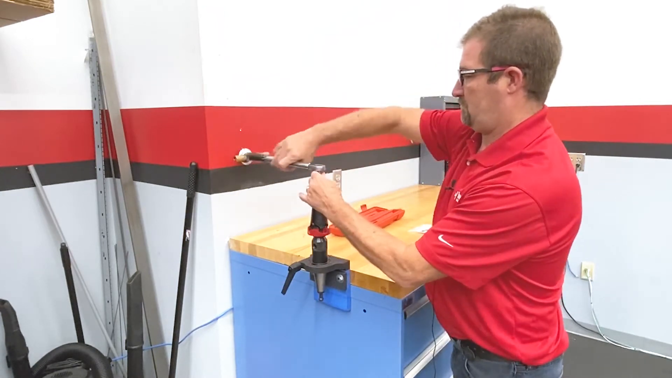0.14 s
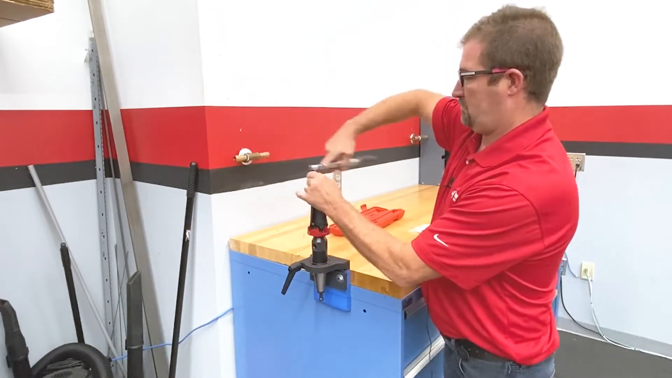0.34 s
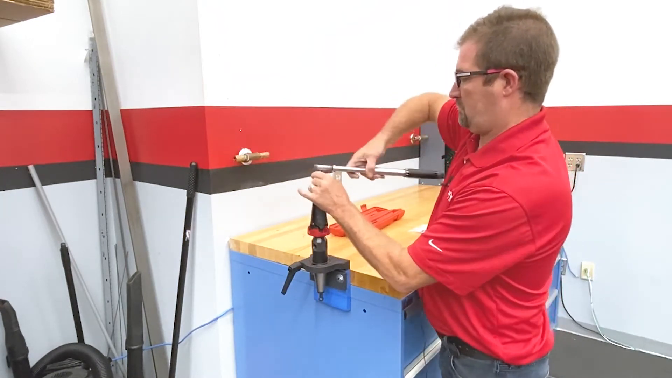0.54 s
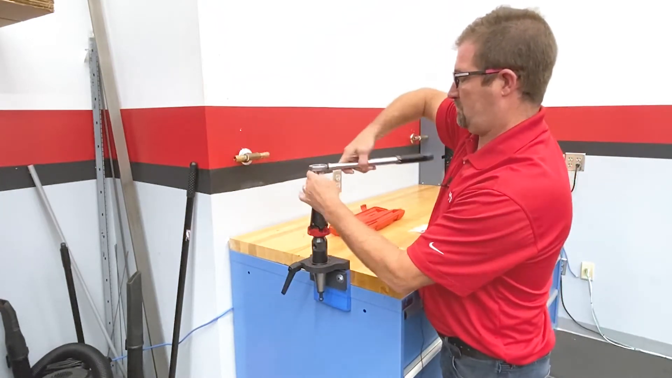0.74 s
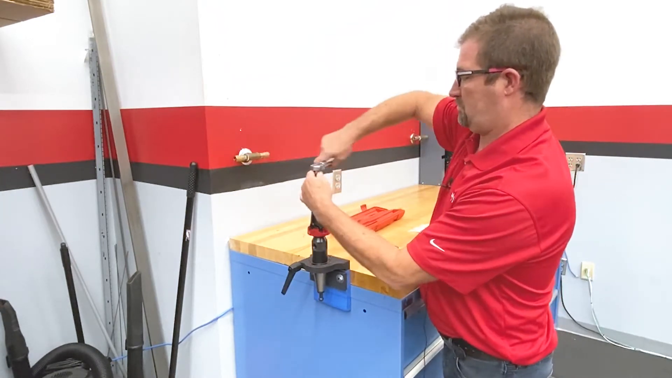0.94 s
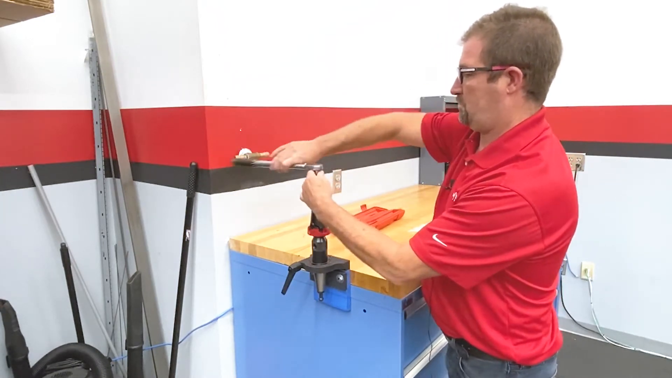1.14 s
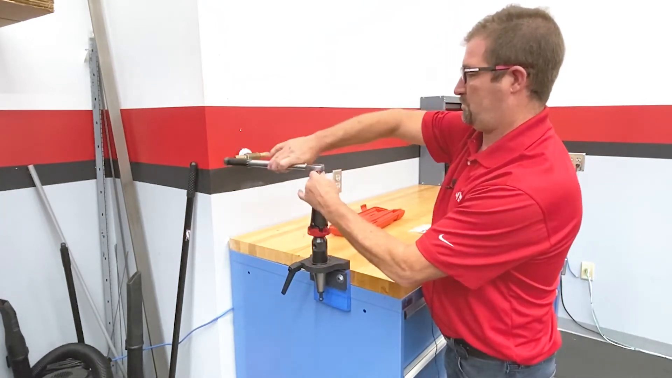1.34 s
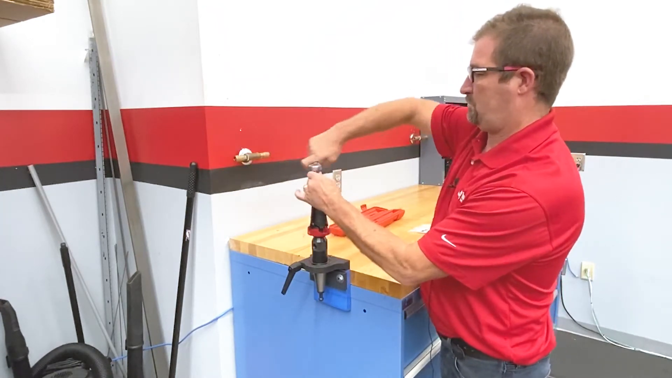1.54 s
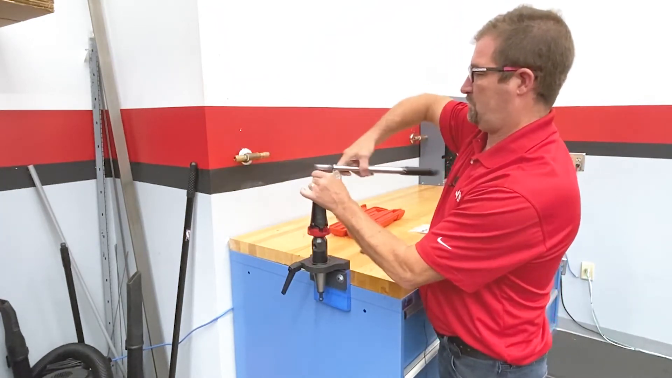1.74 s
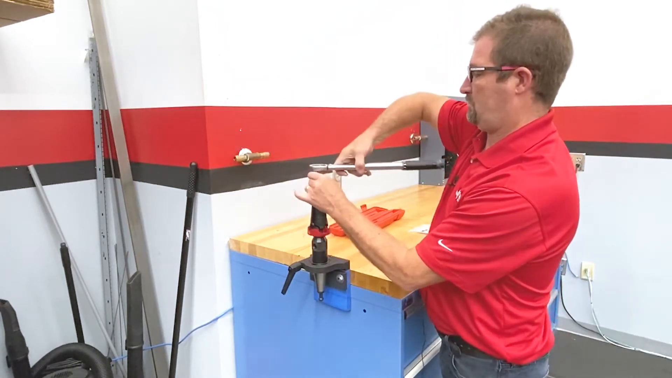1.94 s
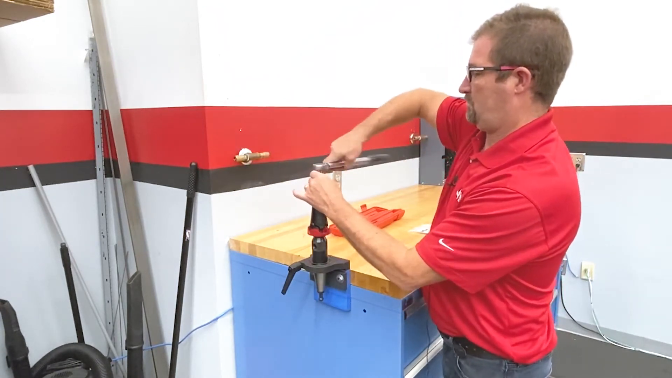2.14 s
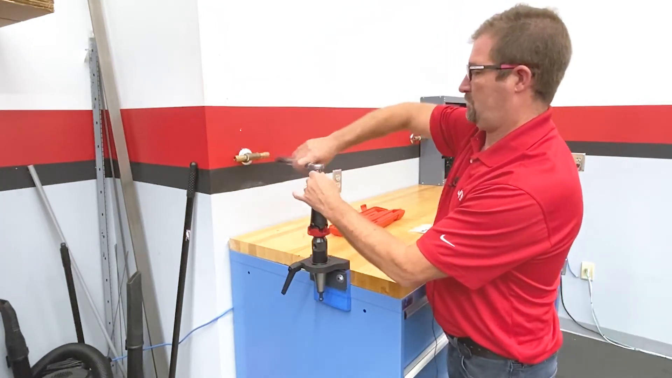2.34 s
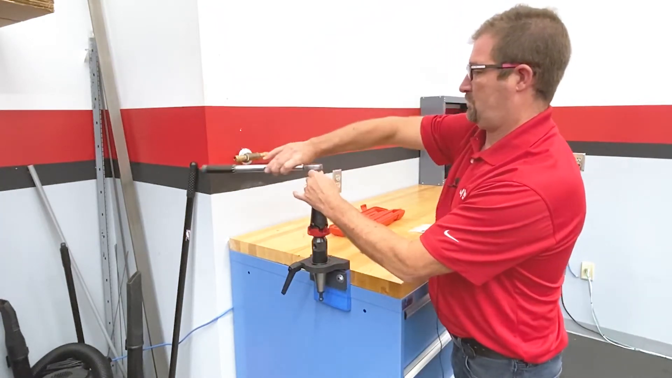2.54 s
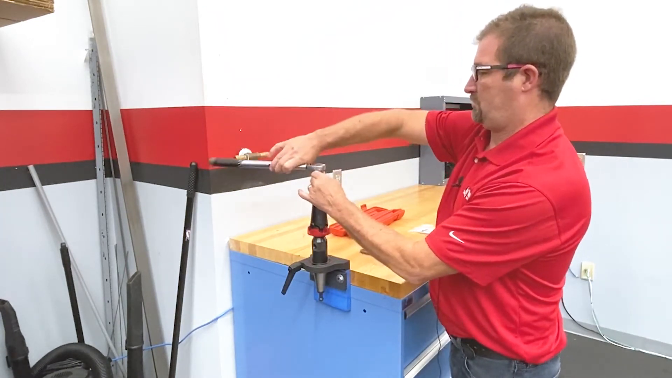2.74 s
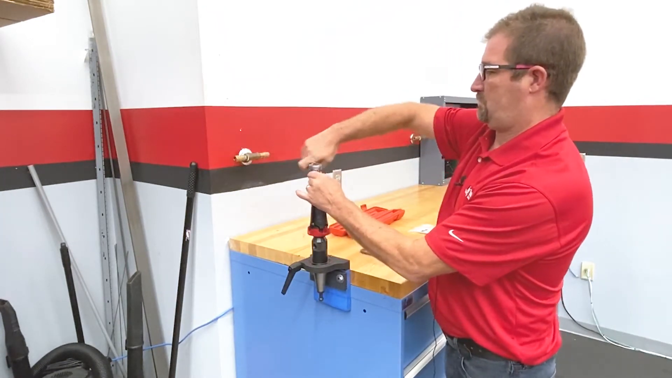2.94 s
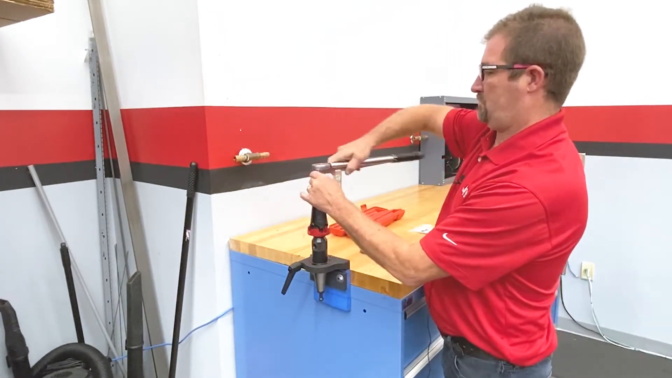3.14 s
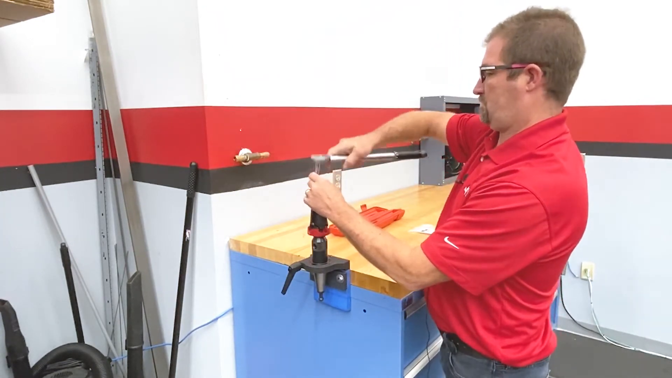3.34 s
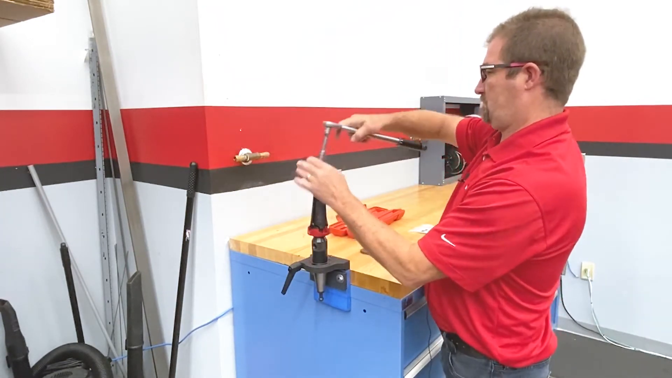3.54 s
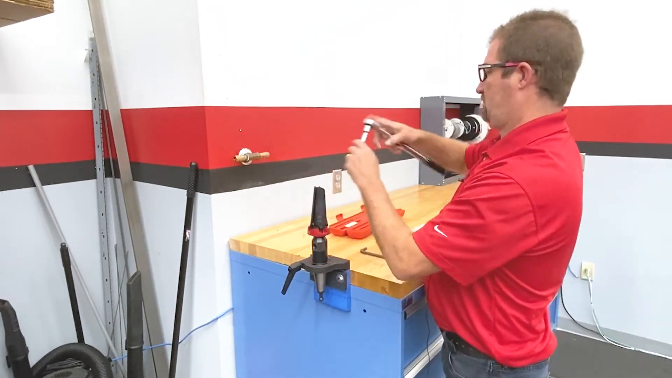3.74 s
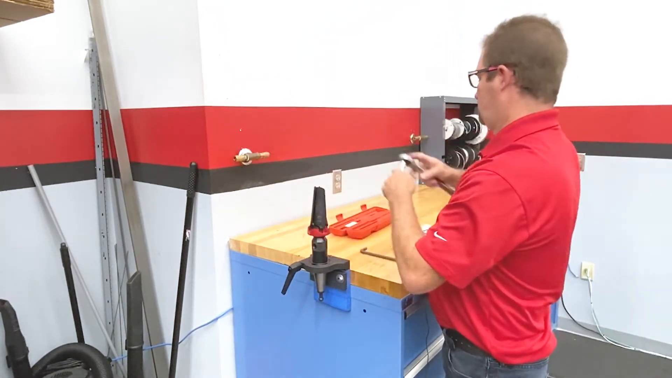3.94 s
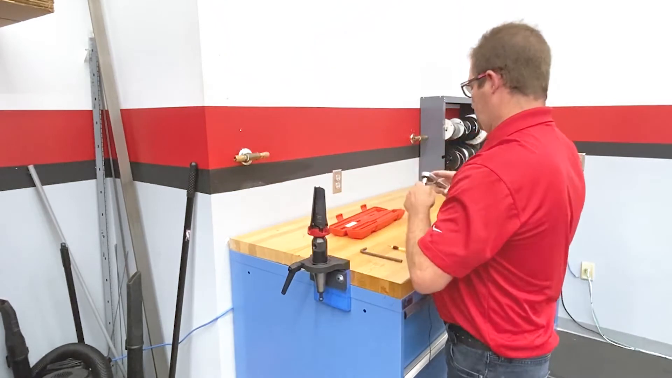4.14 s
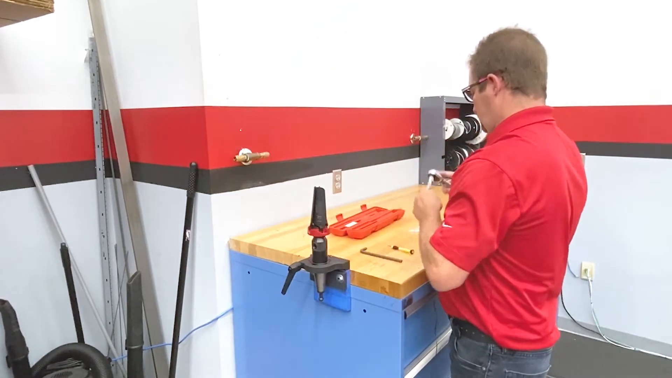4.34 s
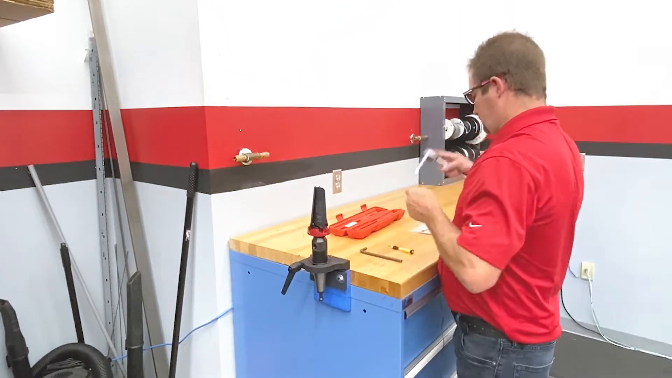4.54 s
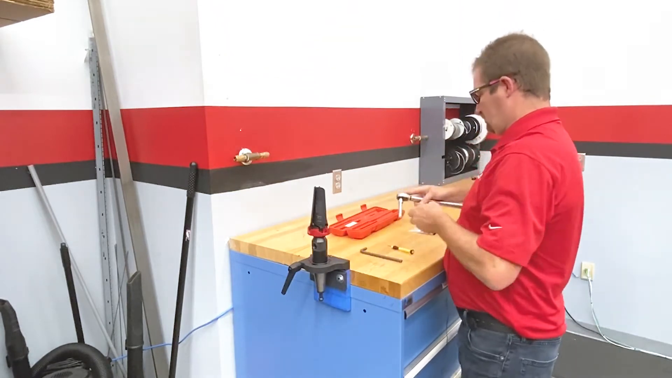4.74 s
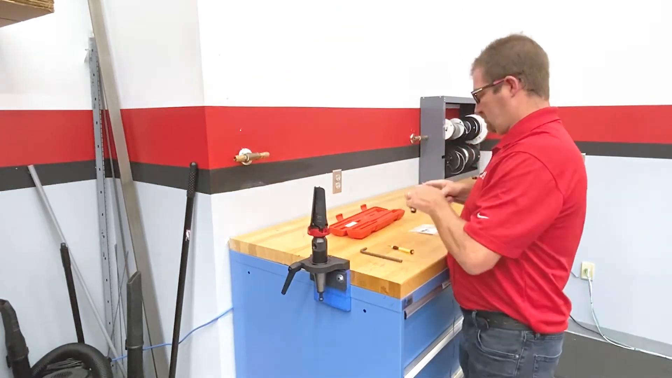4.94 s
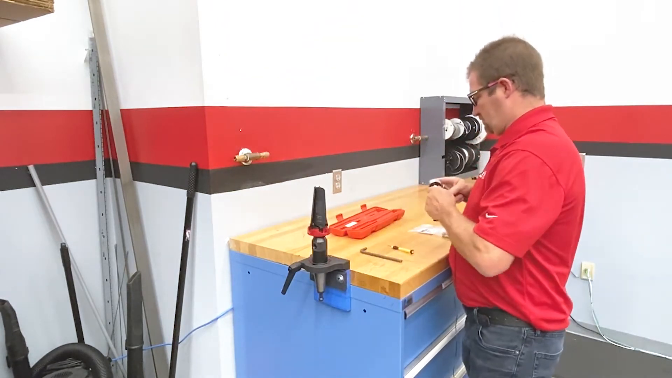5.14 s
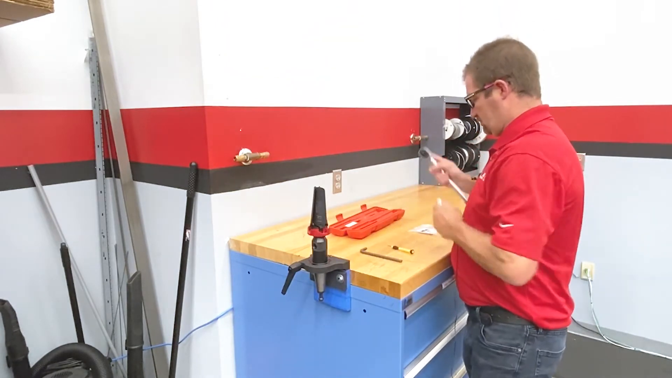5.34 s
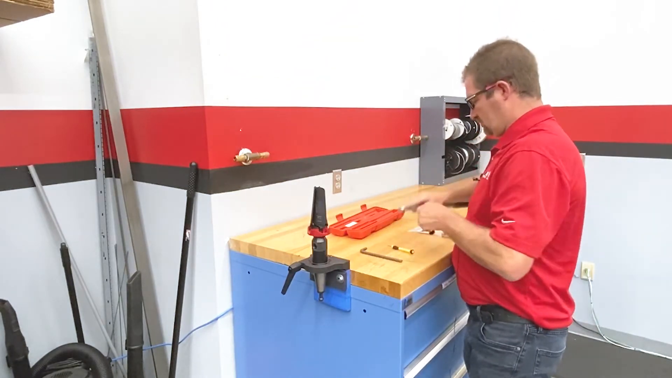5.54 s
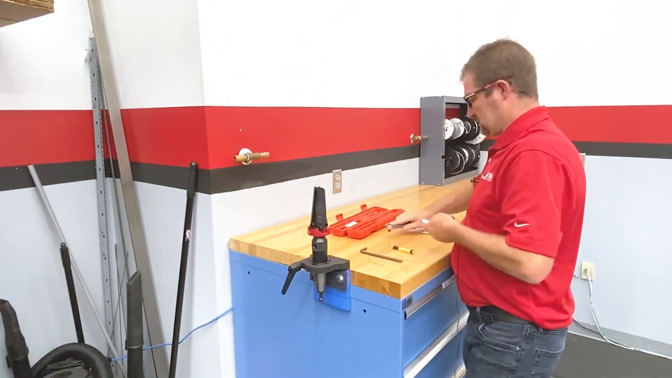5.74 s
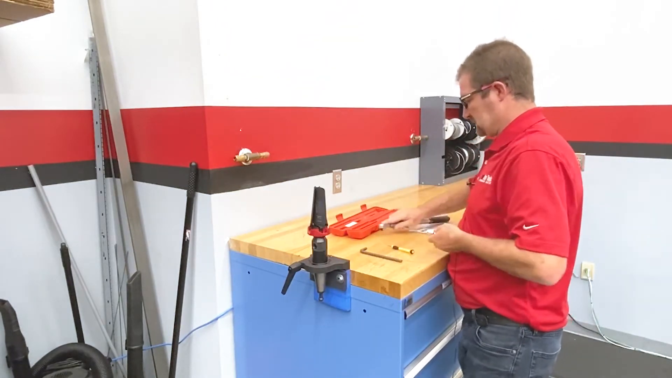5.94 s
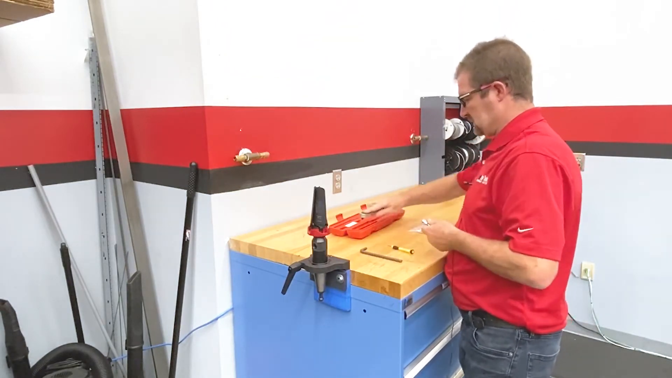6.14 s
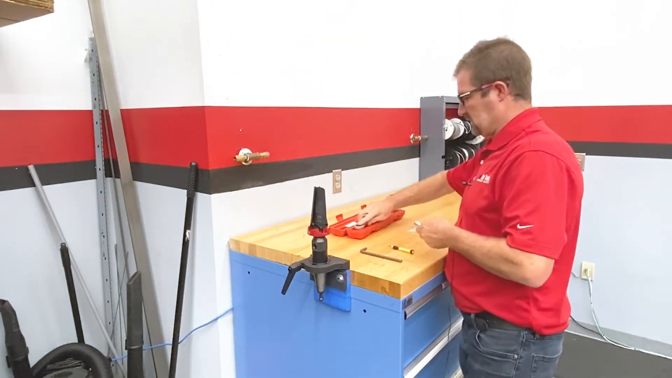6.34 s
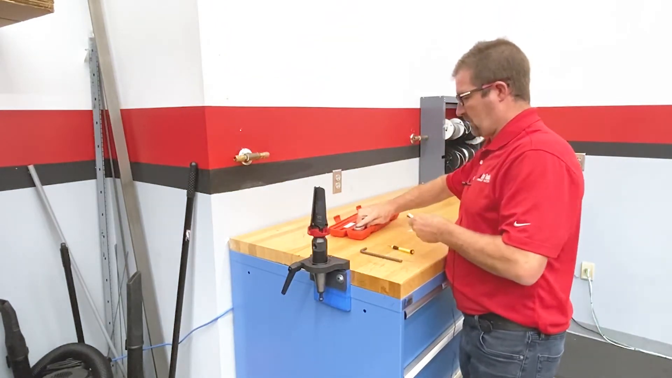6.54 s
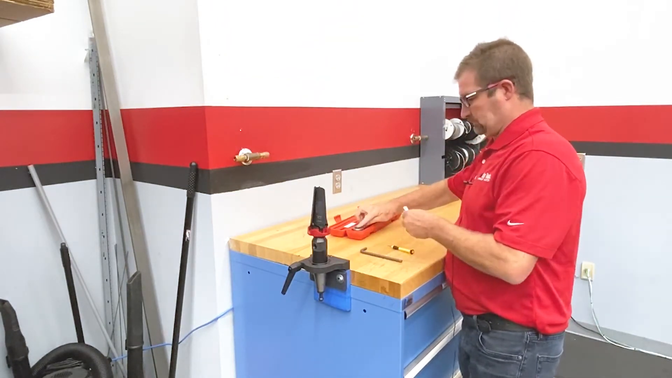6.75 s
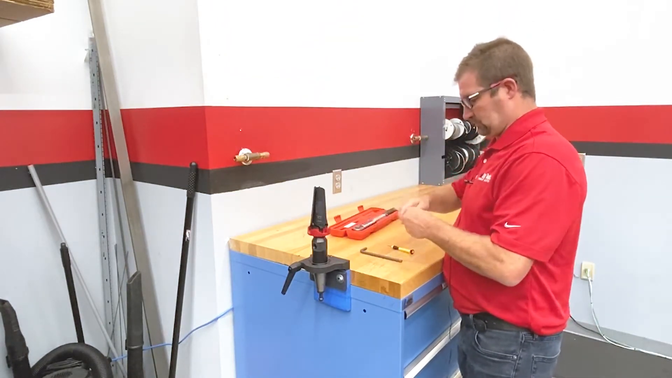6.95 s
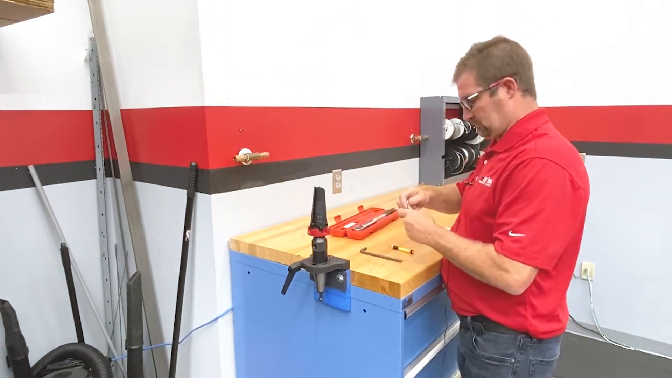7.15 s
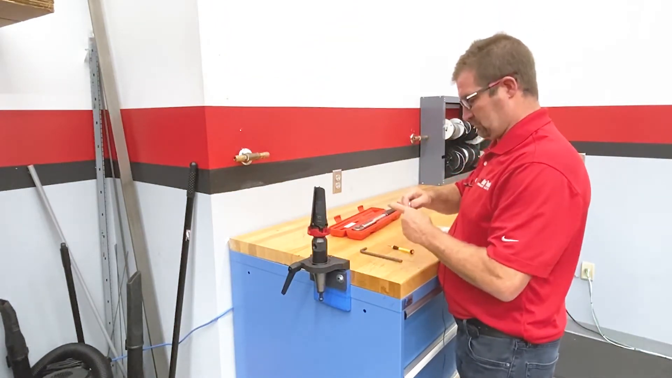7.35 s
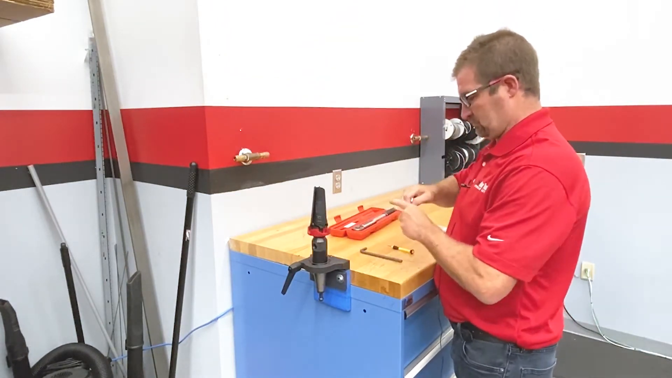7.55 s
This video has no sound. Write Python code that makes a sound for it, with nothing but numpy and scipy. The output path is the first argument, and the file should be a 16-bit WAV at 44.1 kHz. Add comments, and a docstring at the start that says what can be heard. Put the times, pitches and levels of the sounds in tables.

```python
"""Ratcheting a nut loose

A torque wrench clicks through three back-swings in a hard-walled workshop: each click is noise plus ringing steel.
The socket scrapes and squeaks off the nut: many tiny random slips, and a tone that sags in pitch.
Small steel parts clink and the bench thuds: short noise bursts with fading tones, the steel ones roughened.
The wrench is pressed into its plastic case with a loud clunk. Ventilation, filtered noise with fan tones,
murmurs behind. Most of the tool sounds also echo in the room; one microphone listens a few metres off.
"""
import sys
import numpy as np
from scipy import signal
from scipy.fft import rfft, irfft, next_fast_len
from scipy.io import wavfile
from scipy.ndimage import uniform_filter1d

SR = 44100
rng = np.random.default_rng(int(sys.argv[2]) if len(sys.argv) > 2 else 0)


def generate_wav(signal):
    """Clip the signal to [-1, 1] and save it as 16-bit WAV at the path in sys.argv[1]."""
    frames = np.transpose(np.atleast_2d(signal))
    scaled = np.clip(frames, -1, 1) * 32767
    pcm = np.round(scaled).astype(np.int16)
    wavfile.write(sys.argv[1], SR, pcm)


N = 335160
TIME = np.arange(N) / SR  # s, through the whole scene
AGE = np.arange(32768) / SR  # s, since a single sound began
FLAT = [(1, 0)]  # a spectrum that favours no pitch: f/Hz, level/dB


def undb(db):
    """Turn decibels into a gain."""
    return 10 ** (np.asarray(db) / 20)


def unit(x):
    """Scale a sound to the energy of 10 ms at an RMS of 1."""
    wanted_energy = SR / 100
    return x * np.sqrt(wanted_energy / np.sum(x ** 2))


def along(points, hz, column=1):
    """Read between the points of a table, on a logarithmic frequency axis."""
    table = np.transpose(points)
    return np.interp(np.log(hz + 1), np.log(table[0]), table[column])


def colour(x, points, lean_db=0, focus_hz=1000, lift_db=0, focus_octaves=0.16):
    """Filter to a spectrum that leans (dB per octave) about a focus and is lifted there."""
    size = next_fast_len(len(x) * 5 // 8) * 2
    hz = np.arange(size // 2 + 1) * SR / size
    octaves = np.log2(np.maximum(hz, 150) / focus_hz)
    lift = lift_db * np.exp(-.5 * (octaves / focus_octaves) ** 2)
    db = along(points, hz) + lean_db * octaves + lift
    # folding the cepstrum makes the filter answer only after its input, so a blow keeps its sharp start
    cepstrum = irfft(np.log(undb(db)))
    cepstrum[1:size // 2] *= 2
    cepstrum[size // 2 + 1:] = 0
    response = np.exp(rfft(cepstrum))
    return irfft(rfft(x, size) * response)[:len(x)]


def even(x, width_hz, depth):
    """Tame the chance peaks and dips of a noise burst, so that it has little pitch of its own."""
    hz = np.arange(len(x) // 2 + 1) * SR / len(x)
    power = uniform_filter1d(np.abs(rfft(x)) ** 2, max(int(width_hz / hz[1]), 1))
    correction_db = -10 * min(depth, 1) * np.log10(power / power.mean() + 1e-3)
    return colour(x, np.transpose([hz + 1, correction_db]))


def fade(t60):
    """Die away steadily, by 60 dB in t60 seconds."""
    return np.exp(-np.log(1000) * AGE / max(t60, 1e-3))


def crack(spectrum, t60, rise_s):
    """A contact shakes the parts in a dense, quickly dying vibration: a coloured noise burst."""
    age = AGE[:len(AGE) // 4]
    swell = 1 - np.exp(-(age / rise_s) ** 2)
    burst = rng.standard_normal(len(age)) * fade(t60)[:len(age)] * swell
    burst = even(burst, width_hz=6 / max(t60, .002), depth=0.21)
    return np.pad(unit(colour(burst, spectrum)), (0, len(AGE) - len(age)))


def ring(modes, scatter_db=2, detune=0.0056):
    """A struck part rings in fading tones; each call shares the energy a little differently."""
    total = np.zeros(len(AGE))
    chance = rng.standard_normal((len(modes), 3))
    for (hz, db, t60), (sign, size, shift) in zip(modes, chance):
        tone = np.sin(2 * np.pi * hz * (1 + detune * shift) * AGE)
        total += np.sign(sign) * undb(db + scatter_db * size) * fade(t60) * tone
    return unit(total)


def add(track, s, sound):
    """Mix a sound in at a time in seconds."""
    start = max(int(s * SR), 0)
    track[start:start + len(sound)] += sound[:max(N - start, 0)]


def waver(count):
    """Wander at random around zero, in straight lines between count points."""
    return np.interp(TIME, np.linspace(0, TIME[-1], count), rng.standard_normal(count))


def strokes(rows, attack_s, release_s, sag_db_per_s):
    """Strength of rubbing: each stroke swells, weakens while it is held, and dies away."""
    strength = np.zeros(N)
    for s, length_s, db in rows:
        age = np.maximum(TIME - s, 0)
        attack = np.minimum(age / attack_s, 1)
        release = np.exp(-np.maximum(age - length_s, 0) / release_s)
        strength += undb(db - sag_db_per_s * np.minimum(age, length_s)) * attack * release
    return strength


def friction(strength, spectrum, slips_per_s, scatter_db):
    """Rubbing is many tiny slips of unequal size, coloured by the thing that is rubbed."""
    happens = rng.random(N) < slips_per_s / SR
    slips = happens * rng.standard_normal(N) * undb(scatter_db * rng.standard_normal(N))
    sound = colour(slips, spectrum)
    return sound / np.std(sound) * strength


# colour of the moving air: f/Hz, level/dB
AIR_COLOUR = [(25, -12.5), (45, -14), (75, 0.5), (110, -2.5), (155, 3.5), (280, -18), (450, -7), (850, -6),
              (1400, -14), (2200, -21.5), (4000, -25.5), (8000, -33.5), (16000, -49)]
# faint, wavering hum of the fan: f/Hz, level before it sways/dB
FAN_TONES = [(98, -63.5), (164, -62), (219, -62)]


def ventilation(air_db=-50, sway_db=0.2, fan_sway_db=3):
    """Moving air hisses as coloured noise; the fan adds faint, wavering tones."""
    air = colour(rng.standard_normal(N), AIR_COLOUR)
    air = air / np.std(air) * undb(air_db + sway_db * waver(count=30))
    tones = np.zeros(N)
    for hz, db in FAN_TONES:
        size = undb(db + fan_sway_db * waver(count=30))
        tones += size * np.sin(2 * np.pi * hz * TIME + waver(count=25))
    return air + np.sqrt(2) * tones  # the root makes the fan levels RMS


# echo of the workshop, band by band: f/Hz, t60/s, relative level/dB
ROOM_BANDS = [(125, 1, -2), (469, 0.82, 3.5), (1470, 1, -0.5), (3960, 0.85, 1), (7960, 0.64, 0.5),
              (11800, 0.37, 1.5), (16000, 0.34, 0)]


def workshop(x, early_db=-7, tail_db=-6, first_s=.005, spread_s=.009, build_s=0.01):
    """Bench top and corner walls answer first; then a diffuse tail, dying soonest in the treble."""
    early = rng.standard_normal(len(AGE)) * (rng.random(len(AGE)) < .15)
    early = early * (AGE > first_s) * (AGE < first_s + spread_s)
    early = even(early, width_hz=66, depth=0.9)
    hz = np.arange(len(AGE) // 2 + 1) * SR / len(AGE)
    noise = rfft(rng.standard_normal(len(AGE)))
    centres = np.transpose(ROOM_BANDS)[0]
    tail = np.zeros(len(AGE))
    # each band is full at its own centre and fades out towards its neighbours
    for (_, t60, db), share in zip(ROOM_BANDS, np.eye(len(ROOM_BANDS))):
        band = irfft(noise * along(np.transpose([centres, share]), hz))
        tail += undb(db) * fade(t60) * band
    tail = tail * (1 - np.exp(-(AGE / build_s) ** 2))
    response = undb(early_db) * early / np.linalg.norm(early) + undb(tail_db) * tail / np.linalg.norm(tail)
    return signal.fftconvolve(x, response)[:N]


# strokes of hands and sleeves as the arm moves: t/s, length/s, starting level/dB
ARM_STROKES = [(.21, 0.49, -42), (.72, 0.1, -44.5), (1.37, 0.03, -57), (1.5, 0.69, -53.5),
               (2.75, 0.038, -49), (3.36, 0.3, -61)]
# colour of hands and sleeves on the tool: f/Hz, level/dB
RUB_COLOUR = [(50, -27.5), (150, 3), (280, 5.5), (520, 2.5), (900, -1), (1500, -2), (2500, -10),
              (6000, -23.5), (16000, -27.5)]


def hands(hold_db=-54.5):
    """Hands and sleeves rub on the tool; just holding it rustles faintly."""
    arm = undb(hold_db) + strokes(ARM_STROKES, attack_s=0.019, release_s=0.0405, sag_db_per_s=21)
    return friction(arm, RUB_COLOUR, slips_per_s=2500, scatter_db=0.5)


# tones of the wooden top: f/Hz, relative level/dB, t60/s
BENCH_MODES = [(211, -4, 0.36), (372, -16, 0.43), (496, 3.5, 0.37), (577, 2, 0.038), (617, 5.5, 0.31),
               (708, 5, 0.13), (838, -14.5, 0.26), (891, 4.5, 0.12), (1090, -10, 0.077), (1127, -5, 0.065),
               (1267, 2.5, 0.122), (1572, 11.5, 0.059), (1780, -2.5, 0.14), (1990, -21, 0.0432)]
# tones of the cabinet under it: f/Hz, relative level/dB, t60/s
CABINET_MODES = [(76.4, -6.5, 0.44), (82.6, -4.5, 0.21), (107.6, -21, 0.45)]


def bench(hits, spectrum, rise_s, ring_db, room_db):
    """A blow rings the wooden top; the cabinet under it booms on."""
    near, far = np.zeros((2, N))
    boom = ring(CABINET_MODES) * (1 - fade(t60=0.15))  # the heavy panels take a moment to swing up
    for s, db, t60, lean_db, boom_db in hits:
        blow = crack(spectrum, t60, rise_s) + undb(ring_db) * ring(BENCH_MODES)
        knock = undb(db) * unit(colour(blow, FLAT, lean_db))
        add(near, s, knock + undb(db + boom_db) * boom)
        add(far, s, undb(room_db) * knock)
    return np.array([near, far])


# soft thuds: t/s, level/dB, contact t60/s, lean/dB per octave, boom level against the thud/dB
THUDS = [(.175, -36.5, 0.11, 3, -2.5), (.50, -35, 0.077, -2.5, -22.5), (.799, -33, 0.06, -3, -30),
         (1.917, -33.5, 0.21, -0.5, -28), (3.17, -34, .11, 3.5, -25), (3.529, -32, 0.14, 6.5, -29),
         (5.8365, -26, 0.046, 2, -13), (5.843, -26, 0.35, 2, 1)]
# colour of their contact: f/Hz, level/dB
THUD_COLOUR = [(30, -38), (70, -17), (150, 2.5), (300, -1), (600, 3.5), (930, 1), (1250, -8.5), (2000, -25),
               (2500, -13), (3200, -29), (8000, -32), (16000, -53)]


def bench_thuds():
    """Soft blows into the bench give dull bursts with a little wooden ring."""
    return bench(THUDS, THUD_COLOUR, rise_s=0.0015, ring_db=-11, room_db=3.0)


# wrench against its case: t/s, level/dB, contact t60/s, lean/dB per octave, boom level against the knock/dB
CASE_HITS = [(5.895, -38, 0.084, 2.5, -6), (6.3835, -31, 0.041, -1.5, -11), (6.4415, -17, 0.09, -1.5, -19),
             (6.474, -25.5, 0.038, -4, -25), (6.599, -17, 0.022, -2.5, -10.5),
             (6.652, -25, 0.026, 0.5, -25), (6.692, -12.5, 0.056, -1.5, -24),
             (6.7025, -4, 0.032, 0.26, -12.5), (6.711, -13, 0.13, -1.5, -14),
             (6.7745, -19.5, 0.061, 2, -11), (6.815, -17.5, 0.066, -2, -9)]
# colour of the plastic case, knocked or rattled: f/Hz, level/dB
CASE_COLOUR = [(30, -21), (60, -22), (150, -32), (300, -4), (550, 1.5), (1000, 5), (1600, 0), (2300, -3),
               (3200, -10), (5500, -17), (9000, -22.5), (16000, -33)]


def case_knocks():
    """The wrench knocks the plastic case, which passes each blow to the bench."""
    return bench(CASE_HITS, CASE_COLOUR, rise_s=0.00087, ring_db=-8.5, room_db=-2.5)


# the wrench rattles and scrapes in its slot: t/s, length/s, starting level/dB
RATTLES = [(6.47, 0.066, -35.5), (6.71, 0.13, -28)]


def case_rattle():
    """Sparse, very unequal slips rattle against the plastic."""
    strength = strokes(RATTLES, attack_s=0.0058, release_s=0.058, sag_db_per_s=38)
    return friction(strength, CASE_COLOUR, slips_per_s=900, scatter_db=5.0)


# parts are carried from the vice to the back of the bench; their room sound changes: t/s, room level/dB
CARRY = [(3.6, -2.5), (4.3, 3.5), (7.4, .5)]


def steel(contacts, spectrum, modes, rise_s, chatter=0.63, chatter_hz=450):
    """Steel on steel; the place of contact decides which tones speak most."""
    near, far = np.zeros((2, N))
    for s, db, t60, ring_db, focus_hz, lift_db in contacts:
        # loose parts chatter against each other while they ring, which roughens and widens every tone
        roughness = np.interp(AGE * chatter_hz, np.arange(len(AGE)), rng.standard_normal(len(AGE)))
        rough_ring = unit(ring(modes) * (1 + chatter * roughness))
        touch = crack(spectrum, t60, rise_s) + undb(ring_db) * rough_ring
        clink = undb(db) * unit(colour(touch, FLAT, 0, focus_hz, lift_db))
        room_db = np.interp(s, *np.transpose(CARRY))
        add(near, s, clink)
        add(far, s, undb(room_db) * clink)
    return np.array([near, far])


# small parts knock: t/s, level/dB, contact t60/s, ring against contact/dB, most excited f/Hz, lift there/dB
BIT_HITS = [(5.7095, -36.5, 0.058, 3.5, 9400, 7.3), (6.1066, -34, 0.081, -10.5, 9900, 16.7),
            (6.1954, -40.5, .12, -16, 3600, 6), (6.218, -42, .073, -17, 3600, 8),
            (7.045, -46.5, .02, -3.5, 9100, 7.6), (7.328, -21, 0.023, 3, 2170, 6.2),
            (7.3885, -19, 0.032, -7.5, 10040, 16.6), (7.394, -27, 0.06, -4, 9500, 6.9),
            (7.567, -20, 0.028, -22, 10560, 21.5), (7.573, -22, 0.038, -14, 6030, 17)]
# colour of their contact: f/Hz, level/dB
BIT_COLOUR = [(300, -25), (1300, -13), (2100, -0.5), (3800, 4.5), (5500, -1.5), (7000, 0.5), (9500, -8),
              (11500, -15), (13000, -19), (16000, -21)]
# their ringing tones: f/Hz, relative level/dB, t60/s
BIT_MODES = [(2207, -3, 0.18), (2760, -3, 0.055), (3600, -24, 0.04), (3970, -1, 0.087), (6230, 1.5, 0.054),
             (6600, -3, 0.069), (9040, 1, 0.054), (9000, -8, 0.059), (9300, -20, 0.051),
             (9380, 15.5, 0.037), (9900, -10.5, .07), (9350, -29, 0.11)]


def small_bits():
    """Small steel parts knock together and ring in high tones."""
    return steel(BIT_HITS, BIT_COLOUR, BIT_MODES, rise_s=0.0001)


# knocks, faint ticks and a small scrape of steel at the socket:
# t/s, level/dB, contact t60/s, ring against contact/dB, most excited f/Hz, lift there/dB
SOCKET_CONTACTS = [(.233, -39, 0.071, -18, 3760, 9), (.501, -31, .062, -10, 4500, -8),
                   (.7085, -29.5, 0.077, -24, 4330, 4), (1.029, -52, .05, -19, 3400, 12),
                   (1.25, -51, 0.082, -14, 3330, 7), (2.6597, -45, 0.038, -22, 3230, 5.5),
                   (3.4945, -35.5, .015, -10, 7100, 6), (3.5279, -19.5, 0.015, -7.5, 5130, 8.5),
                   (3.5332, -16.5, 0.013, -20, 8550, 12), (3.554, -23, 0.085, -21.5, 7040, 4.5),
                   (3.799, -31.5, 0.075, -14, 2520, 10.5), (4.206, -49, 0.034, -15.5, 2640, 18),
                   (4.310, -53.5, .087, -25, 6240, 9), (4.3795, -38.5, .015, 3, 7500, 23),
                   (4.3828, -24, 0.018, -15, 9730, 17), (4.394, -36, .04, -10, 2920, 11),
                   (5.0545, -19.5, 0.021, -4, 4150, 9.5), (5.060, -22, 0.022, -6.5, 9700, 4),
                   (5.331, -31.5, 0.031, -1, 2820, 11)]
# colour of its contact: f/Hz, level/dB
SOCKET_COLOUR = [(200, -31), (700, -13), (1250, -1.5), (1800, -0.5), (2500, 6), (5000, 6), (9000, 1.5),
                 (11500, 1), (16000, -3.5)]
# its ringing tones: f/Hz, relative level/dB, t60/s
SOCKET_MODES = [(2560, -1, 0.066), (2630, -25, 0.079), (2960, -10, 0.046), (3580, -18.5, 0.046),
                (3820, -17.5, 0.054), (4250, -2, 0.064), (4200, -25.5, 0.059), (4430, -19, 0.067),
                (9620, 9.5, 0.018), (9820, 3.5, .028), (10170, 6, .029), (13400, -5, .025)]


def socket():
    """Knocks, faint ticks and a small scrape set the socket's steel ringing."""
    return steel(SOCKET_CONTACTS, SOCKET_COLOUR, SOCKET_MODES, rise_s=0.00035)


# short pulls that slide the socket up the nut: t/s, length/s, starting level/dB
PULLS = [(3.356, 0.026, -35), (3.402, 0.06, -37), (3.49, 0.011, -39.5)]
# colour of the sliding: f/Hz, level/dB
SLIDE_COLOUR = [(300, -9.5), (1000, -11), (1600, -6.5), (2600, -10.5), (4300, -8), (6000, -11.5),
                (8000, -15.5), (16000, -25.5)]


def socket_slide():
    """The socket scrapes up the nut in a dense rush of slips."""
    strength = strokes(PULLS, attack_s=0.0089, release_s=0.02, sag_db_per_s=20)
    return friction(strength, SLIDE_COLOUR, slips_per_s=16000, scatter_db=7)


# squeaks on the way up: t/s, length/s, starting level before flutter/dB
SQUEAKS = [(3.402, 0.017, -36), (3.442, 0.019, -35), (3.47, .035, -43)]


def squeak(base_hz=1992, sag_hz=616, tight_s=3.452, tight_width_s=0.032, wobble=0.074, flutter_db=4):
    """The tight socket sticks and slips: a rough tone that sags in pitch around the tightest spot."""
    tightness = np.exp(-((TIME - tight_s) / tight_width_s) ** 2)
    pitch_hz = (base_hz - sag_hz * tightness) * (1 + wobble * waver(count=6000))
    size = strokes(SQUEAKS, attack_s=0.0037, release_s=0.0077, sag_db_per_s=60.5)
    size = size * undb(flutter_db * waver(count=2500))
    return size * np.sin(2 * np.pi * np.cumsum(pitch_hz) / SR)


# a hard snap has about this level and lean; softer and slower snaps are duller
SNAP_DB, SNAP_LEAN_DB = -13, 1.78  # dB; dB per octave, before the tooth rate adds to it
LEAN_PER_DB, LEAN_PER_TOOTH_RATE = 0.57, .085  # dB per octave, per dB of force and per tooth a second
# the pawl drops over teeth in three back-swings, with stray faint ticks between:
# t/s, level before each part's share/dB, lift of the head's main ring/dB
PAWL_DROPS = [(0.164, -25.5, -8), (0.2503, -16, -2), (0.2893, -18.5, 3), (0.3179, -18, 7), (0.353, -15, 2),
              (0.3942, -15.5, 1), (0.4332, -15, 4), (0.4814, -20, 3), (0.5299, -15.5, 3),
              (0.5961, -15, 1.5), (1.3897, -44.5, 2), (1.4785, -36, 0), (1.4821, -16.3, 6.5),
              (1.5243, -15, 5), (1.5658, -15, 1), (1.6023, -18, 1), (1.6382, -17.5, 4), (1.675, -14.5, 13),
              (1.7138, -15, 7), (1.7609, -15.5, 10), (1.8078, -14.7, 11), (1.8931, -28, -8),
              (1.9039, -15.5, 4), (2.2, -35, -7), (2.767, -43, 5), (2.8385, -33, 0), (2.8425, -16.5, 7.5),
              (2.8951, -15.5, -10), (2.9412, -17, 2.5), (2.9814, -18.5, 0), (3.0194, -15, -2),
              (3.052, -16, 1), (3.0853, -16, 2), (3.1199, -16, -7), (3.1708, -14.5, 9), (3.253, -16.5, 5)]
# colour of the ratchet head's contact: f/Hz, level/dB
HEAD_COLOUR = [(300, -29.5), (1200, -24), (2200, -5.5), (3300, -2), (4300, 2.5), (6000, -1), (8300, 2),
               (9400, 0), (12500, -0.5), (14500, -8), (16000, -2)]
# ringing tones of the head: f/Hz, relative level/dB, t60/s
HEAD_MODES = [(4340, -7, 0.021), (5000, 0, 0.016), (5040, -29.5, 0.023), (5020, -13, 0.032),
              (6910, 6, 0.013), (8920, -9, 0.017), (12150, 4, 0.0087), (13300, 10, 0.0095)]
# colour of the dull knock through handle and vice: f/Hz, level/dB
VICE_COLOUR = [(60, -31), (150, -27), (250, 1.5), (350, -6), (520, 2), (750, -6), (950, -9), (1300, -0.5),
               (2500, -8), (5000, -17)]


def ratchet(click_db=-6, ring_db=-6, knock_db=-16, snap_t60=0.0088, head_t60=0.11, head_db=-4,
            slip_db=-16, slip_s=0.00062, head_hz=5080, rebound_db=-12, room_db=-3.0):
    """The pawl slips off a tooth and snaps down, the head rings, the vice passes a dull knock to the room."""
    near, far = np.zeros((2, N))
    gaps_s = np.diff(np.transpose(PAWL_DROPS)[0], prepend=-1)
    # a very short gap is the pawl catching on the same tooth, so it counts as no rate
    teeth_per_s = np.where(gaps_s > .02, 1 / gaps_s, 0)
    for (s, db, lift_db), rate in zip(PAWL_DROPS, teeth_per_s):
        force_db = max(db - SNAP_DB, -10)
        lean_db = SNAP_LEAN_DB + LEAN_PER_DB * force_db + LEAN_PER_TOOTH_RATE * rate
        snap = crack(HEAD_COLOUR, snap_t60, rise_s=0.00066)
        snap = snap + undb(head_db) * crack(HEAD_COLOUR, head_t60, rise_s=0.0021)
        snap = snap + undb(ring_db) * ring(HEAD_MODES, detune=0.0035)
        level_db = db + click_db
        click = undb(level_db) * unit(colour(snap, FLAT, lean_db, head_hz, lift_db, focus_octaves=0.14))
        slip = undb(level_db + slip_db) * crack(HEAD_COLOUR, snap_t60, rise_s=0.00035)
        rebound = undb(level_db + rebound_db) * crack(HEAD_COLOUR, 0.0081, rise_s=.0004)
        knock = undb(db + knock_db) * crack(VICE_COLOUR, 0.029, rise_s=0.0014)
        add(near, s - slip_s, slip)
        add(near, s, click)
        add(near, s + rng.uniform(0.005, 0.0087), rebound)  # the pawl bounces once
        add(far, s, undb(room_db) * click + knock)
    return np.array([near, far])


def scene():
    """Mix all sources: near is heard directly, far feeds the room, rubbing goes both ways."""
    near, far = bench_thuds() + case_knocks() + small_bits() + socket() + ratchet()
    rubbing = hands() + case_rattle() + socket_slide() + squeak()
    return (ventilation() + near + rubbing + workshop(far + rubbing))[None]


def record(dry, low_cut_hz=40, top_hz=15750):
    """Peaks beyond full scale are clipped flat; then the deep bass and the top are cut."""
    clipped = np.clip(dry, -1, 1)
    thinned = signal.sosfilt(signal.butter(2, low_cut_hz, "high", fs=SR, output="sos"), clipped)
    return signal.sosfilt(signal.ellip(10, .2, 70, top_hz, fs=SR, output="sos"), thinned)


dry = scene()
out = record(dry)
generate_wav(out)
```